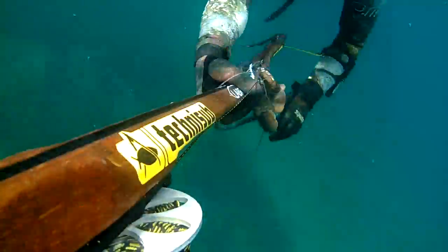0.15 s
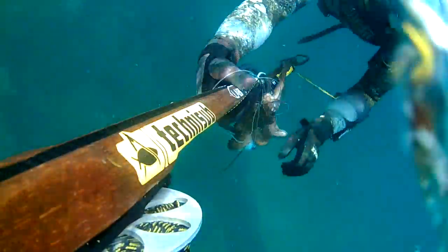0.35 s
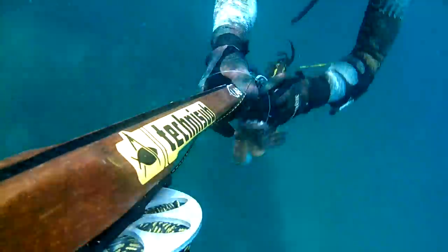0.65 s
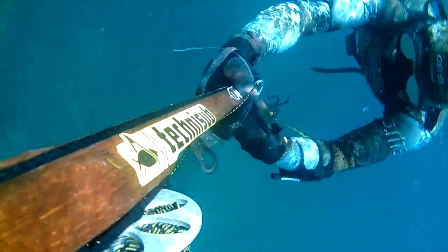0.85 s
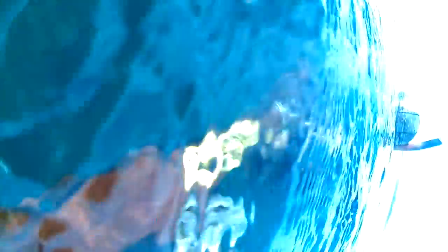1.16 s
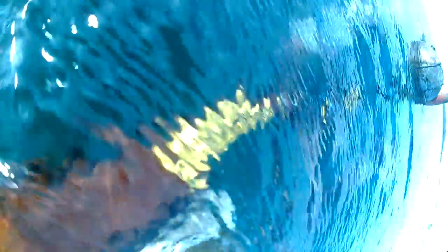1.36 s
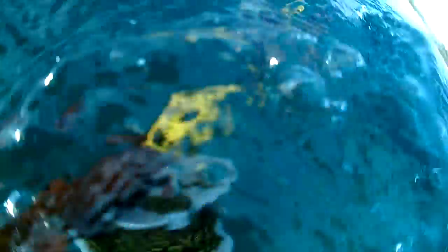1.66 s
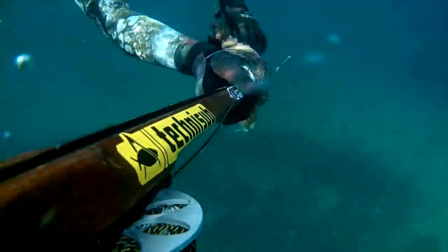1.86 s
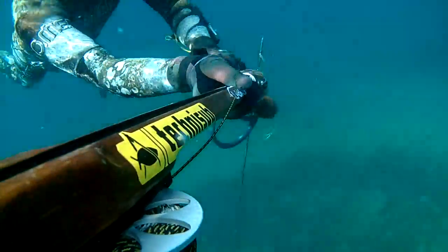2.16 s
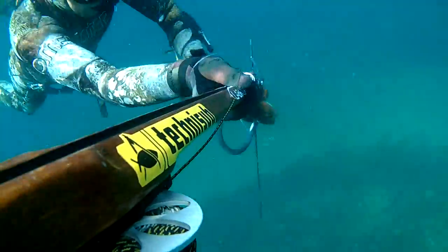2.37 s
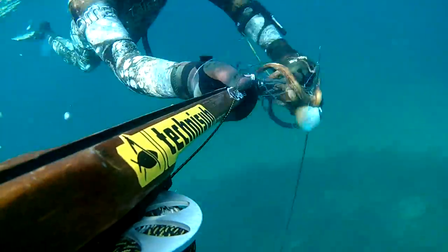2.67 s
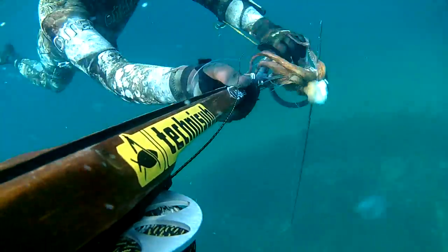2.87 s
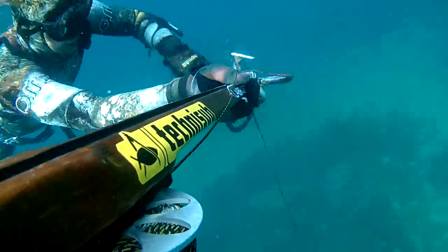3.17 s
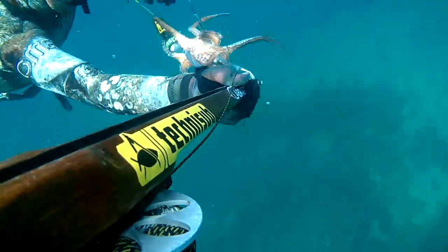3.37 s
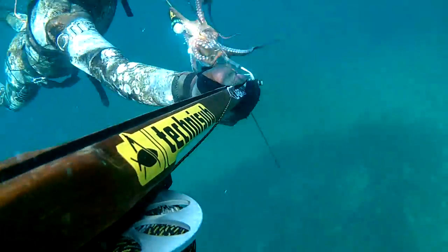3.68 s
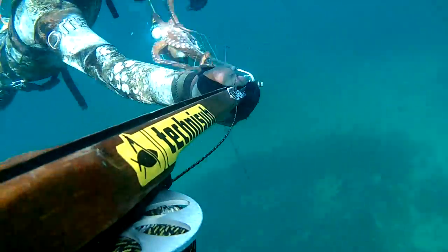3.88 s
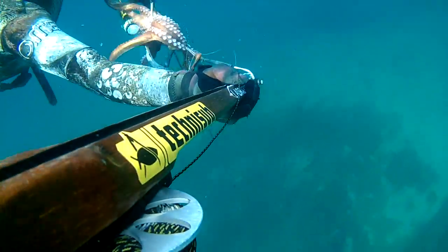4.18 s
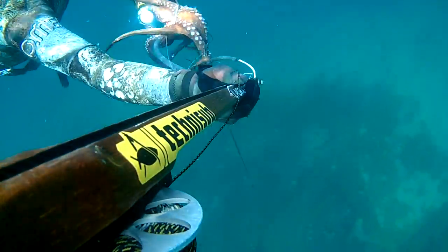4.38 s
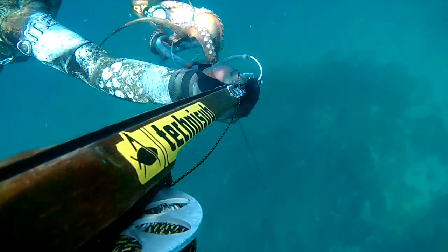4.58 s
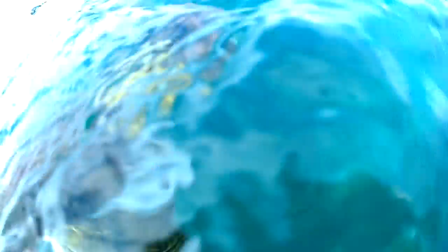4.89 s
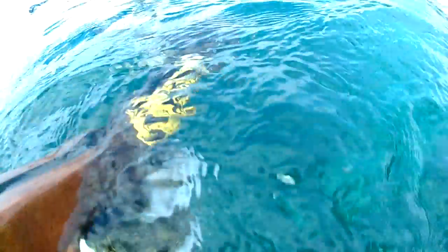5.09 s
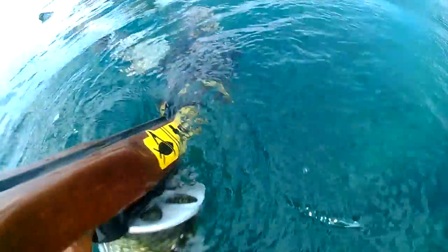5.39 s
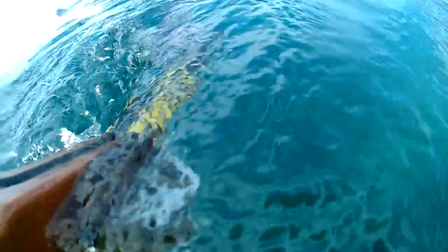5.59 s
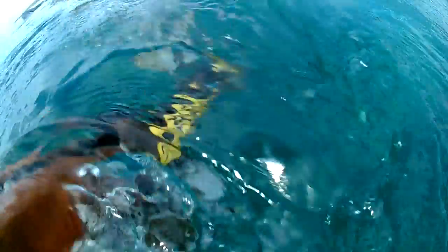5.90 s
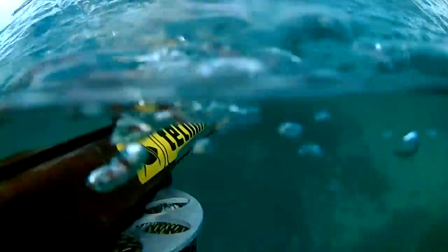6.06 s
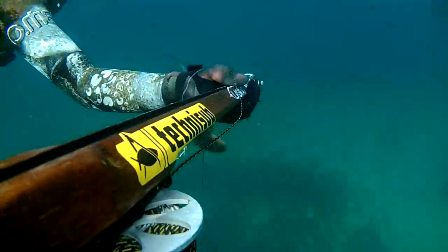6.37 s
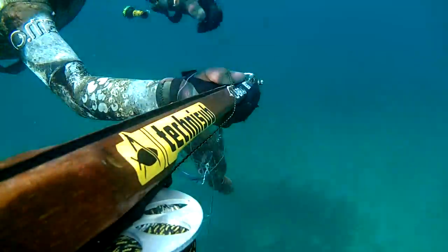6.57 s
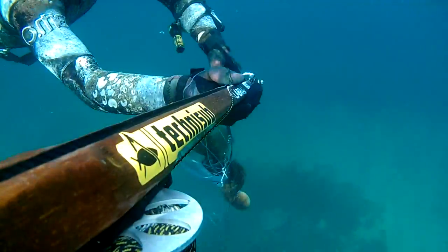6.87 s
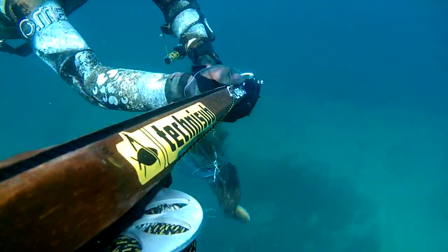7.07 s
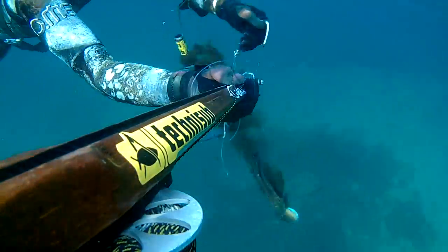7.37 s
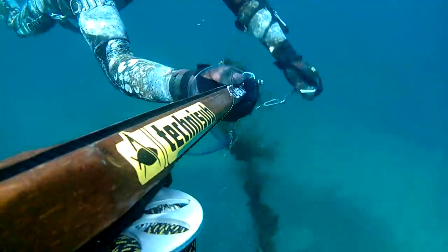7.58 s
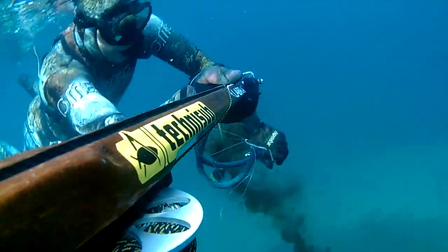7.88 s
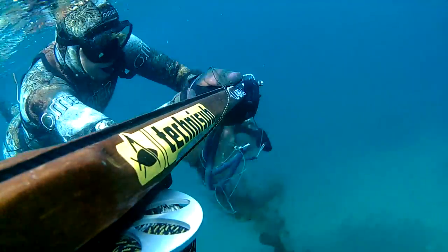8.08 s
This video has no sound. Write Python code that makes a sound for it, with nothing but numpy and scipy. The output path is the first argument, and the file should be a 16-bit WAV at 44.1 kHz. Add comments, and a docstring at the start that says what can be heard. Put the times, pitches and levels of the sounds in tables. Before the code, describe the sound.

Close, muffled bubbling is heard through a sealed camera housing at the sea surface, with soft low sloshing and a faint steady wash underneath. Scattered bubble pops, knocks and droplet clicks open, with a gurgle building around 1 second. At 1.6 seconds comes the loudest moment: a sharp slap and a gush of ringing bubbles that overloads the microphone, with a brief low moan of trapped air. Busy gurgling continues until about 2.8 seconds. Single bloops stand out at 3.1 and 3.5, followed by small soft pops that fade to a lull near 4.7. Sloshing and bubbles return at 5 seconds, then a loud cluster of slaps and knocking bubbles hits from 5.9 to 6.2. Quiet trickling follows, with a few light pops after 7 seconds. One last strong knock and ringing bloop with a short gush comes at 7.6, then dies down by 8.

```python
"""Muffled bubbles burst and knock over a gurgle, heard from a sealed camera housing at the sea surface. Large
bubbles ring at their own pitch and shake the housing; small ones stream past in gushes. A few large air pockets
moan and glide, sharp slaps crack high above the bubbles, and water sloshes over a distant wash. The microphone
overloads on the loudest bubbles; the housing muffles everything above a few kHz."""
import sys
import numpy as np
from scipy import signal
from scipy.fft import rfft, irfft
from scipy.io import wavfile
from scipy.ndimage import uniform_filter1d

SR = 44100
rng = np.random.default_rng(int(sys.argv[2]) if len(sys.argv) > 2 else 0)


def dump(signal):
    """Clip the signal to [-1, 1] and save it as 16-bit WAV at the path in sys.argv[1]."""
    limited = np.clip(np.atleast_2d(signal).T, -1, 1)
    pcm = np.round(limited * 32767).astype(np.int16)
    wavfile.write(sys.argv[1], SR, pcm)


N = 363384

# bubbles against the housing: t/s, level/dB, f/Hz, drive/ms, t60/ms
BIG_BUBBLES = [(0.01, -10.5, 1149, 2, 66), (0.0966, -3, 1206, 0.3, 10.7), (0.1057, -15, 1300, 4, 12),
               (0.173, -21, 1230, 3.9, 8), (0.379, -12, 1242, 1.37, 13), (0.5477, -12.5, 860, 0.33, 47),
               (0.573, -14, 1134, 0.94, 16), (0.6068, -16, 1660, 0.36, 33), (0.613, -12.5, 840, 0.64, 79),
               (0.8233, -16, 1057, 2.64, 14), (0.8417, -22, 1050, 2.7, 14.4), (0.921, -31, 700, 3, 15),
               (0.97, -15.5, 1370, 1.6, 58), (1.0403, -14.5, 1315, 0.7, 100),
               (1.098, -24.5, 1276, 0.65, 22), (1.204, -22, 1200, 4, 15), (1.238, -11, 1173, 0.5, 10),
               (1.3874, -10.5, 1530, 0.14, 2.5), (1.5867, 13, 1064, 3.2, 12.7), (1.6162, 0.5, 931, 1.6, 46),
               (1.6782, -6.5, 944, 1.0, 43), (1.6942, 7, 1052, 1.6, 26), (1.698, -13, 585, 8, 60),
               (1.7239, -6.5, 855, 0.94, 170), (1.787, -9, 742, 6.6, 14), (1.7944, -11.5, 1222, 3.6, 46),
               (1.8411, -9.5, 1075, 7.2, 5.5), (1.9062, -5, 687, 2.3, 47), (1.9257, -11, 892, 1.6, 34),
               (1.965, -6, 1307, 0.38, 17.5), (2.0069, -10, 813, 3.6, 15), (2.1454, -8, 850, 5.1, 8),
               (2.1798, -6, 675, 1.5, 75), (2.1989, -10.5, 728, 0.94, 37), (2.2496, -8.5, 965, 1.0, 47),
               (2.2867, -10, 820, 1.5, 18), (2.303, -13, 830, 5, 15), (2.3605, 0, 867, 2.5, 7.5),
               (2.4, -9.5, 825.4, 2.6, 120), (2.6465, -11.5, 1000, 4, 7.6), (2.6811, -9, 807, 4.3, 37),
               (2.749, -6.5, 822, 1.2, 39), (2.968, -18, 904, 4.8, 11), (3.1275, -9.5, 881, 1.7, 65),
               (3.529, -4, 938, 4.7, 35), (3.5852, -5.5, 918, 0.66, 23), (3.586, -16.5, 1617, 2.6, 14.5),
               (3.66, -18.5, 988, 1.8, 52), (3.701, -22, 980, 1.3, 30), (3.699, -30, 1390, 2, 45),
               (3.727, -25, 1370, 4.8, 34), (3.7564, -26, 1425, 1.2, 42), (3.8045, -18.5, 1029, 0.83, 80),
               (3.819, -22, 850, 2, 35), (3.8373, -27, 1700, 2, 12), (3.851, -26, 850, 2, 50),
               (3.8795, -21, 838, 2.6, 90), (3.897, -25, 1200, 2, 20), (3.9203, -21, 1033, 1.7, 45),
               (3.943, -20, 1415, 3.4, 20), (3.971, -18, 1180, 0.81, 27), (3.9765, -29, 1710, 2, 60),
               (4.0316, -25.5, 1558, 0.92, 57), (4.146, -39, 1270, 1.6, 31), (4.3092, -23, 1200, 1.3, 14),
               (4.3347, -21, 1090, 2, 18), (4.3445, -22, 960, 2, 35), (4.3614, -25.5, 1010, 2.7, 34),
               (4.403, -28, 1270, 1, 28), (4.4235, -27, 1150, 2, 12), (4.4279, -32, 1890, 3, 25),
               (4.434, -20.5, 1285, 0.61, 20), (4.459, -28, 1220, 0.91, 14), (4.4798, -22.5, 1092, 1.2, 50),
               (4.508, -33, 1100, 10, 20), (4.563, -38.5, 1900, 0.89, 20), (4.652, -34.5, 916, 0.72, 28),
               (5.0128, -15, 1302, 10, 11), (5.045, -14, 1160, 0.37, 84), (5.083, -18.5, 562, 1.6, 26),
               (5.1305, -15, 1304, 0.69, 41), (5.4175, -15, 1680, 2, 5.7), (5.4228, -17.5, 1207, 3.3, 29),
               (5.4684, -12, 1310, 9, 10), (5.6052, -27, 1203, 3.9, 25), (5.742, -27, 1400, 2, 12),
               (5.762, -27.5, 1350, 3, 32), (5.813, -24, 1300, 2, 15), (5.8237, -24, 1280, 5.6, 46),
               (5.861, -25, 1350, 4, 15), (5.8716, -18.5, 1342, 1.2, 39), (5.8885, -17, 1190, 0.43, 35),
               (5.928, -19, 830, 5.4, 18), (5.942, -11, 950, 2, 15), (5.968, -7, 1960, 1.1, 13),
               (6.036, -7, 950, 4, 50), (6.05, -12.5, 1750, 1.5, 13), (6.0786, -14, 1560, 1.6, 19),
               (6.094, -2, 966, 0.69, 21), (6.099, -6, 1320, 2, 22), (6.135, -11, 760, 0.67, 12),
               (6.1723, 0, 882, 3.6, 13), (6.247, -31, 1370, 4.4, 20), (6.626, -31, 1060, 4.1, 64),
               (7.063, -31, 1070, 3.6, 41), (7.1164, -26, 1130, 3.7, 22), (7.138, -29, 1070, 5, 15),
               (7.15, -27, 1150, 4, 18), (7.1634, -17, 1088, 2, 30), (7.23, -28, 1100, 3, 20),
               (7.243, -27, 1170, 3.2, 20), (7.286, -33, 1270, 4, 20), (7.358, -32, 1060, 2, 12),
               (7.408, -31, 1110, 1.3, 18), (7.4475, -31, 1202, 6.7, 20), (7.5001, -22, 987, 7.6, 63),
               (7.629, -3.5, 934, 0.71, 6.1), (7.6439, -1, 839, 1.8, 108), (7.669, -10, 806, 2.6, 15),
               (7.7339, -24, 1427, 1.0, 54)]
# housing resonances: f/Hz, width/Hz, gain/dB
HOUSING_MODES = [(464, 30, -5), (865, 50, -2), (1167, 280, -6.5), (1858, 220, -11), (2750, 200, -16),
                 (3680, 970, -21)]
# small-bubble stream: t/s, trickle level/dB, centre f/Hz, spray offset/dB, slosh offset/dB
BUBBLE_STREAM = [(0.0, -39, 996, -31, -31.5), (0.45, -59.5, 1213, -7, -43), (0.9, -69.5, 1102, -22.5, -39),
                 (1.1, -35, 1325, -16.5, -24), (1.5, -57, 1227, -13, -43), (1.72, -32, 867, -21.5, -41.5),
                 (2.2, -35, 812, -34, -33), (2.8, -39.5, 775, -27.5, -32), (3.6, -56.5, 926, -22.5, -25.5),
                 (4.1, -57.5, 1027, -17, -43.5), (4.88, -59.5, 1165, -16, -30),
                 (5.1, -41.5, 1395, -24, -21.5), (5.35, -68.5, 1176, -19, -51),
                 (5.83, -42.5, 1303, -23, -38.5), (6.12, -45.5, 923, -10.5, -34),
                 (6.4, -54.5, 826, -23, -37.5), (6.7, -54.5, 1014, -37, -36),
                 (7.35, -58.5, 1190, -27.5, -34.5), (7.7, -45.5, 820, -19, -46.5),
                 (8.24, -54, 881, -7.5, -34)]


def gain_of(db):
    """dB to amplitude."""
    return 10 ** (np.asarray(db) / 20)


def unit_rms(x):
    """Scale to rms 1."""
    return x / np.sqrt(np.mean(x ** 2) + 1e-20)


def spectrum_gain(points, hz):
    """Gain at hz from (f/Hz, level/dB) points on a log-frequency axis."""
    point_hz, db = np.transpose(points)
    return gain_of(np.interp(np.log(hz + 1), np.log(point_hz + 1), db))


def curves(rows):
    """Columns after t/s, interpolated per sample."""
    times_s, *columns = np.transpose(rows)
    return [np.interp(np.arange(N) / SR, times_s, column) for column in columns]


def add(mix, at_s, sound):
    """Mix a sound in at at_s."""
    part = mix[max(round(at_s * SR), 0):][:len(sound)]
    part += sound[:len(part)]


def passband(x, kind, hz):
    """Third-order high- or low-pass."""
    return signal.sosfilt(signal.butter(3, hz, kind, fs=SR, output="sos"), x)


def resonate(x, modes):
    """Parallel resonators."""
    return sum(gain_of(db) * signal.lfilter(*signal.iirpeak(hz, hz / width_hz, SR), x)
               for hz, width_hz, db in modes)


def bubble(hz, drive_s, t60_s, rise_per_s, attack_s):
    """A gliding sine that swells, holds while air is fed, then decays."""
    t = np.arange(round((drive_s + t60_s) * SR) + 1) / SR
    swell = np.sin(np.pi / 2 * np.minimum(t / attack_s, 1)) ** 2
    decay = gain_of(-60 * np.maximum(t - drive_s, 0) / t60_s)
    return swell * decay * np.sin(2 * np.pi * hz * (t + rise_per_s * t ** 2 / 2))


def sea(level_db=-64):
    """Steady distant wash of shaped noise."""
    # wash spectrum: f/Hz, relative level/dB
    wash_spectrum = [(18, -56.5), (30, -18.5), (1300, -2.5), (1440, -16), (1810, -6.5), (2430, -22),
                     (4460, -44), (5800, -62), (9810, -120)]
    spectrum = rfft(rng.standard_normal(N)) * spectrum_gain(wash_spectrum, np.fft.rfftfreq(N, 1 / SR))
    return gain_of(level_db) * unit_rms(irfft(spectrum, N))


def stream_level_db(rise_db_per_s=1000, fall_db_per_s=460):
    """Gushes swell, hold and fade over the trickle; their powers add."""
    # gushes of small bubbles: t/s, hold/s, level/dB
    gushes = [(0.0, 0.0043, -21), (.474, 0.0081, -32), (0.554, 0.0026, -23.5), (0.639, 0.26, -42.5),
              (0.952, 0.088, -28.5), (1.028, 0.075, -24), (1.11, 0.075, -30), (1.2, .1, -31),
              (1.349, 0.27, -35), (1.618, 0.02, -11), (1.691, 0.044, -11), (1.75, 0.073, -18.5),
              (1.988, 0.034, -24.5), (2.168, 0.058, -17), (2.272, 0.16, -23.5), (2.479, 0.058, -32),
              (2.625, 0.03, -25), (2.76, 0.087, -31.5), (2.916, 0.018, -39.5), (3.098, .22, -35),
              (3.441, 0.16, -36.5), (3.604, 0.27, -46), (4.423, 0.093, -46), (5.032, 0.057, -30.5),
              (5.137, 0.029, -29.5), (5.28, 0.0066, -45.5), (5.39, 0.061, -36.5), (5.554, .005, -48.5),
              (5.645, 0.045, -33), (5.755, 0.0037, -34.5), (5.818, 0.018, -34.5), (5.949, 0.0063, -18),
              (6.044, 0.0042, -23), (6.122, 0.079, -37), (6.308, 0.0052, -40.5), (6.635, 0.07, -39),
              (6.811, 0.068, -49), (7.09, 0.175, -40.5), (7.3, 0.065, -44), (7.507, .1, -40),
              (7.637, 0.048, -24)]
    t = np.arange(0, N / SR, .001)
    at_s, hold_s, db = np.transpose(gushes)[:, :, None]
    drop_db = rise_db_per_s * np.maximum(at_s - t, 0) + fall_db_per_s * np.maximum(t - at_s - hold_s, 0)
    gush_power = np.interp(np.arange(N) / SR, t, gain_of(2 * (db - drop_db)).sum(0))
    trickle_db = curves(BUBBLE_STREAM)[0]
    return 10 * np.log10(gush_power + gain_of(2 * trickle_db))


def impulses(per_s):
    """Sparse clicks of random size and sign."""
    return gain_of(2.5 * rng.exponential(1, N)) * rng.choice([-1, 1], N) * (rng.random(N) < per_s / SR)


def slosh(stream_db, follow=0.73, smooth_s=0.057):
    """Low lumpy pushes of water on the housing, sluggishly following the stream."""
    # slosh resonances: f/Hz, width/Hz, gain/dB
    modes = [(65, 36, -2), (155, 30, 0), (260, 140, -6)]
    push_db = follow * uniform_filter1d(stream_db, round(smooth_s * SR)) + curves(BUBBLE_STREAM)[-1]
    lumps = resonate(resonate(impulses(per_s=80), modes), modes)
    return unit_rms(lumps) * gain_of(push_db)


def churn(throb, centre_hz):
    """Churning water: large bubbles stir the low housing modes, small ones the higher."""
    water = throb * rng.standard_normal(N)
    low_share = np.clip((1350 - centre_hz) / 550, .15, .75)
    low, high = resonate(water, HOUSING_MODES[:2]), resonate(water, HOUSING_MODES[2:4])
    return unit_rms(passband(low_share * low + (1 - low_share) * high, "low", 2100))


def spray(throb, mist_db=-18):
    """Dense ticks ring the top housing mode under a faint bright mist."""
    ticks = np.sqrt(throb) * impulses(per_s=3000)
    ringing = unit_rms(resonate(resonate(ticks, HOUSING_MODES[-1:]), HOUSING_MODES[-1:]))
    mist = unit_rms(passband(ticks, "high", 1800))
    return unit_rms(ringing + gain_of(mist_db) * mist)


def small_bubbles(centre_hz, per_s=450, log_spread=.25, t60_cycles=14, size_db=3.5, housing_db=8):
    """Random rising chirps around a moving pitch, partly heard through the housing."""
    draws = rng.random((9000, 5))
    times_s = np.cumsum(-np.log(1 - draws[:, 0]) / per_s)
    out = np.zeros(N)
    for at_s, (_, u, v, size, length) in zip(times_s[times_s < N / SR], draws):
        normal = np.sqrt(-2 * np.log(1 - u)) * np.cos(2 * np.pi * v)
        hz = np.clip(centre_hz[int(at_s * SR)] * np.exp(log_spread * normal), 520, 2300)
        chirp = bubble(hz, 1 / hz, t60_cycles * (.5 + length) / hz, rise_per_s=9.3, attack_s=0.0015)
        add(out, at_s, gain_of(-size_db * np.log(1 - .97 * size)) * chirp)
    return unit_rms(out + gain_of(housing_db) * resonate(out, HOUSING_MODES))


def gurgle(stream_db, churn_db=-5.5):
    """Small bubbles stream past over churn and spray, which throb together."""
    _, centre_hz, spray_db, _ = curves(BUBBLE_STREAM)
    chirps = small_bubbles(centre_hz)
    throb = gain_of(5 * unit_rms(uniform_filter1d(rng.standard_normal(N), 500)))
    body = unit_rms(chirps + gain_of(churn_db) * churn(throb, centre_hz))
    return (body + gain_of(spray_db) * spray(throb)) * gain_of(stream_db)


def air_pockets():
    """Large trapped bubbles: soft tones that swell, glide and fade."""
    # air pocket tones: t/s, length/s, level/dB, start f/Hz, end f/Hz
    moans = [(1.725, 0.115, -16.5, 276.3, 295.4), (2.232, 0.1, -23.5, 422, 442),
             (2.33, 0.044, -32.5, 483, 497), (3.611, 0.022, -33.5, 592, 590), (3.701, .09, -40, 577, 702),
             (4.99, .095, -25, 1467, 973), (7.503, .1, -35, 481, 722)]
    out = np.zeros(N)
    for at_s, length_s, db, start_hz, end_hz in moans:
        count = round(length_s * SR)
        cycles = np.cumsum(np.linspace(start_hz, end_hz, count)) / SR
        swell = np.sin(np.pi * np.arange(count) / count)
        add(out, at_s, gain_of(db) * swell * np.sin(2 * np.pi * cycles))
    return out


def slaps(crack_db=1, t60_s=0.013, spread_db=6.5, range_hz=(2820, 3870)):
    """Each slap is a crack of noise with a tiny high ring; listed slaps and the big bubbles' own."""
    # hard slaps: t/s, level/dB, f/Hz
    hard_slaps = [(0.0103, -17, 3410), (0.197, -30.5, 3440), (0.394, -33, 2500), (0.435, -31, 3480),
                  (0.4605, -28, 3000), (0.555, -13, 3600), (0.958, -31, 3740), (1.041, -24, 3570),
                  (1.453, -32, 3500), (1.577, -27, 3970), (1.5864, -1, 3080), (1.68, -19, 2950),
                  (1.799, -20, 3090), (2.17, -18.5, 2810), (2.214, -30, 3650), (2.4264, -25.5, 2800),
                  (3.5167, -18.5, 2710), (3.534, -16.5, 2820), (3.8516, -39.5, 3600), (4.1172, -39.5, 3730),
                  (5.471, -14, 3980), (5.873, -23, 3970), (5.9272, -18.5, 3650), (5.9561, -4.5, 3556),
                  (6.039, -13.5, 2930), (6.08, -20, 4070), (6.0932, -13.5, 3340), (6.1314, -25, 3300),
                  (6.1966, -28, 3760), (7.6457, -13, 3290), (7.7127, -30.5, 3070), (7.8895, -44, 2980),
                  (7.9156, -41, 3360)]
    bubble_slaps = []  # every big bubble also slaps, loud ones much more
    for at_s, bubble_db, *_ in BIG_BUBBLES:
        db = 2.39 * min(bubble_db, -6) - 7.5 + rng.uniform(-spread_db, spread_db)
        bubble_slaps.append((at_s, db, rng.uniform(*range_hz)))
    out, t = np.zeros(N), np.arange(1500) / SR
    for at_s, db, hz in hard_slaps + bubble_slaps:
        add(out, at_s, gain_of(db + crack_db - 60 * t / t60_s) * rng.standard_normal(len(t)))
        add(out, at_s, gain_of(db) * bubble(hz, 0.0012, t60_s, rise_per_s=0, attack_s=0.00019))
    return passband(out, "high", 1100)


def big_bubbles(rise_per_s=0.43, shed_db=-14, burst_db=-4.5, burst_t60_s=0.028, soft_db=-15):
    """Each bubble rings, sheds three smaller ones and shakes the housing with a rough burst."""
    rings, bursts = np.zeros(N), np.zeros(N)
    t = np.arange(3000) / SR
    for at_s, db, hz, drive_ms, t60_ms in BIG_BUBBLES:
        draws = rng.standard_normal((3, 4))
        slow_s = 0.00012 * np.clip(soft_db + 6 - db, 0, 12)  # soft bubbles swell more slowly
        attack_s = 0.0009 + slow_s
        glide_per_s = rise_per_s * (1 + draws[0, 3])
        ring = bubble(hz, drive_ms / 1000 + slow_s, t60_ms / 1000, glide_per_s, attack_s)
        add(rings, at_s, gain_of(db) * ring)
        for delay, detune, size in draws.T[:3]:
            shed = bubble(hz * np.exp(.15 * detune), 0.0028, 0.026, rise_per_s, attack_s)
            add(rings, at_s + .01 * abs(delay), gain_of(db + shed_db + 2 * size) * shed)
        rough = rng.standard_normal(len(t)) ** 3
        envelope_db = db + burst_db + 0.02 * min(db - soft_db, 0) - 60 * t / burst_t60_s
        add(bursts, at_s, gain_of(envelope_db) * np.minimum(t / attack_s, 1) * rough)
    return rings + passband(resonate(bursts, HOUSING_MODES[:-1]), "low", 3400)


def scene():
    """Mono sum of all sources."""
    stream_db = stream_level_db()
    bubbles = passband(big_bubbles() + gurgle(stream_db), "high", 150)
    return (bubbles + slaps() + air_pockets() + slosh(stream_db) + sea())[None]


def record(dry, overload_db=-11.5, hiss_db=-92, cutoff_hz=17200):
    """Microphone overload, housing muffle, amplifier hiss, band limit."""
    # muffling by the housing wall: f/Hz, gain/dB
    wall = [(20, -39), (60, -7.5), (300, -5.5), (900, -0.5), (1300, 0), (1700, -1), (2300, -11.5),
            (3000, -19), (3800, -21.5), (4500, -27), (5000, -50.5)]
    # faint treble leaking past it: f/Hz, gain/dB
    leak = [(6300, -46), (7000, -58), (8000, -40), (9500, -33), (12000, -40), (14000, -62)]
    clipped = dry / (1 + (dry / gain_of(overload_db)) ** 10) ** (1 / 10)
    log_gain = np.log(spectrum_gain(wall + leak, abs(np.fft.fftfreq(4096, 1 / SR))))
    minimum_phase = -signal.hilbert(log_gain).imag
    wall_taps = np.fft.ifft(np.exp(log_gain + 1j * minimum_phase)).real[:2048]
    muffled = signal.oaconvolve(clipped, wall_taps[None])[:, :N]
    hiss = gain_of(hiss_db) * rng.standard_normal(dry.shape)
    lowpass_taps = signal.firwin(511, cutoff_hz, window=("kaiser", 9), fs=SR)
    return signal.oaconvolve(muffled + hiss, lowpass_taps[None], "same")


dry = scene()
out = record(dry)
dump(out)
```